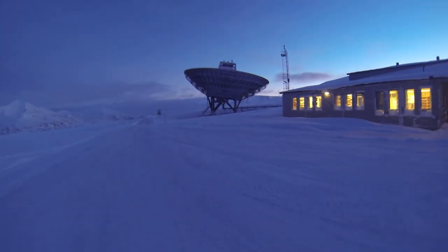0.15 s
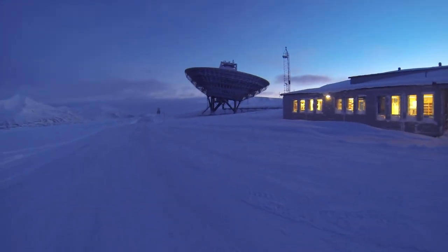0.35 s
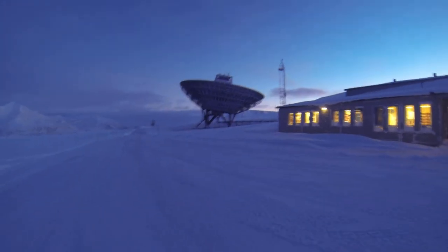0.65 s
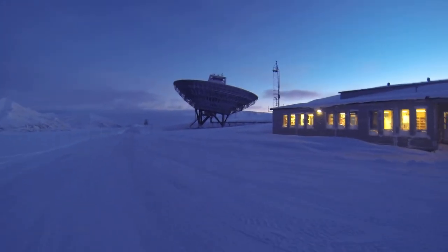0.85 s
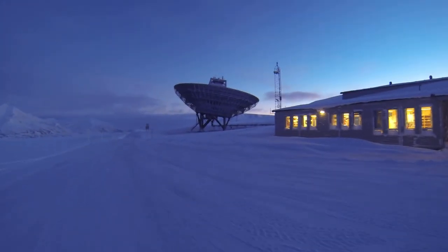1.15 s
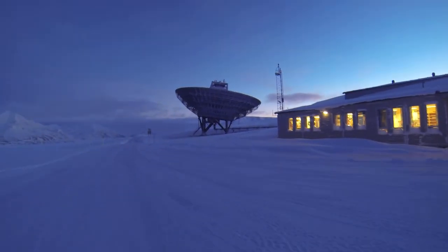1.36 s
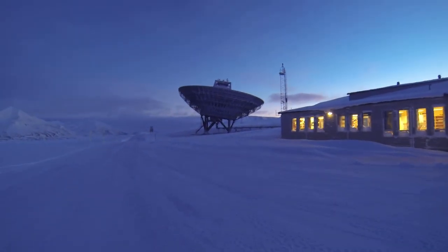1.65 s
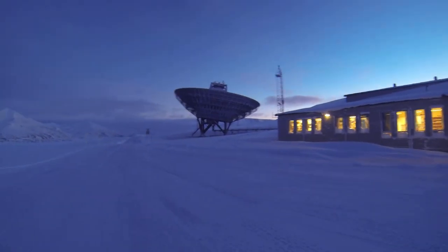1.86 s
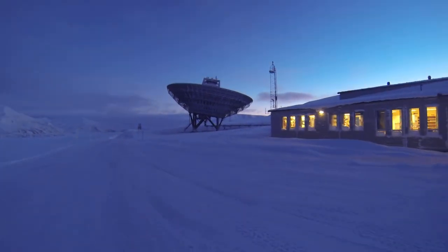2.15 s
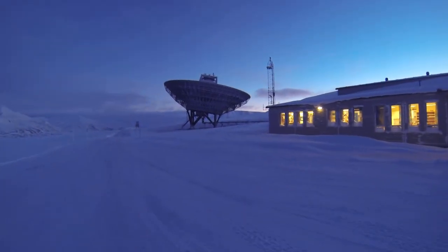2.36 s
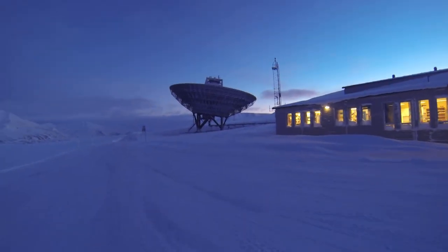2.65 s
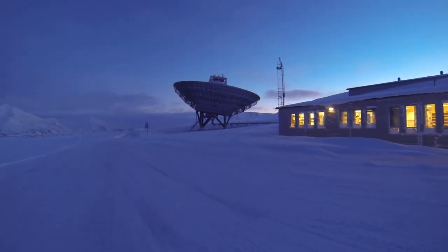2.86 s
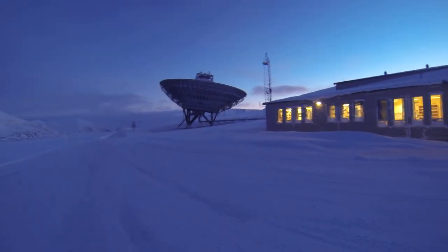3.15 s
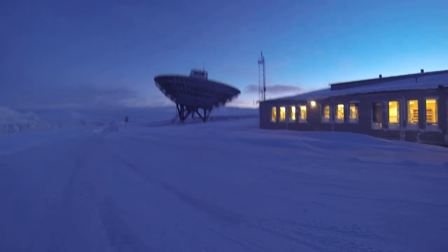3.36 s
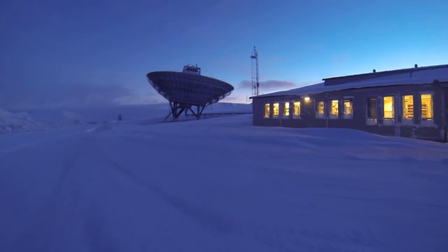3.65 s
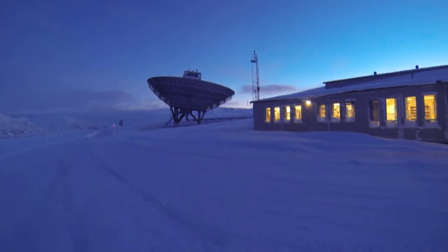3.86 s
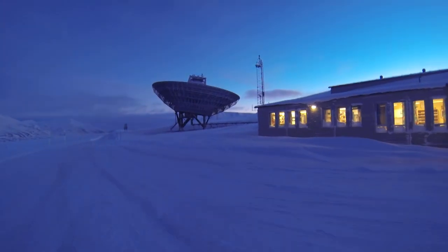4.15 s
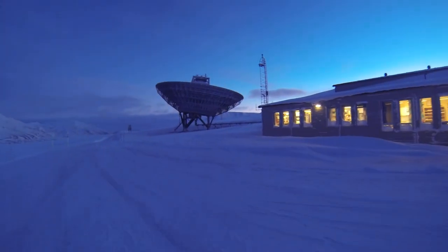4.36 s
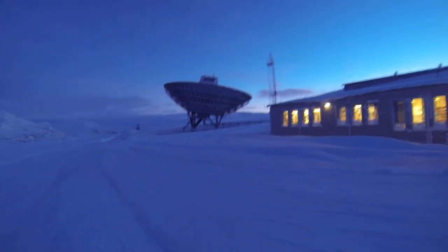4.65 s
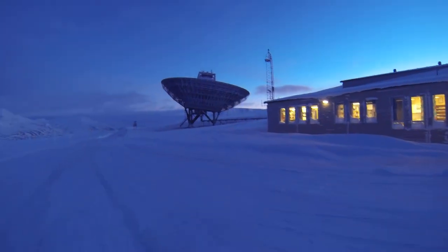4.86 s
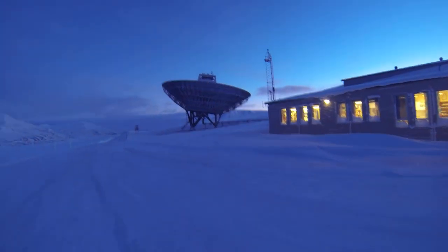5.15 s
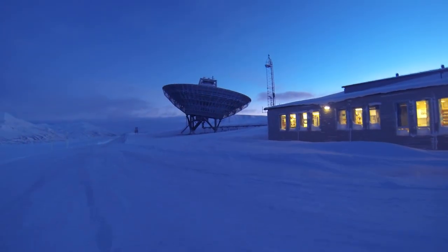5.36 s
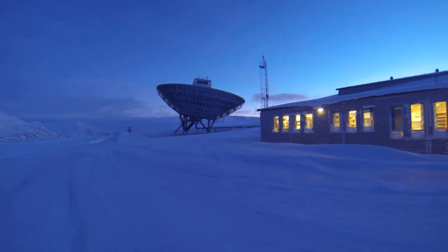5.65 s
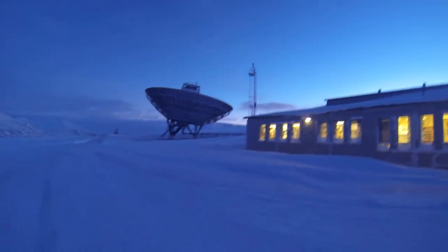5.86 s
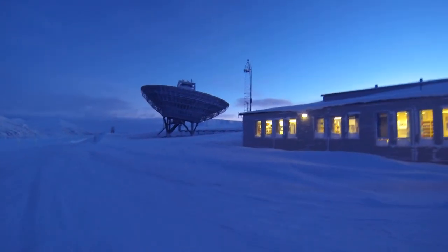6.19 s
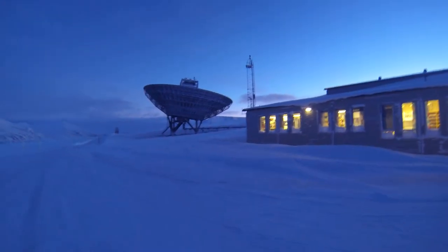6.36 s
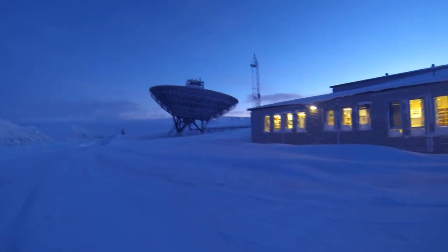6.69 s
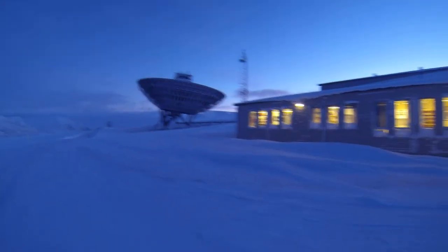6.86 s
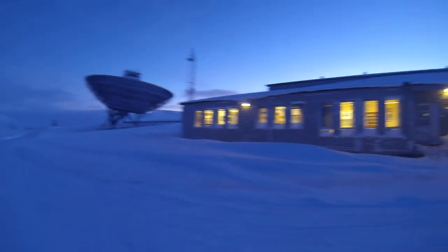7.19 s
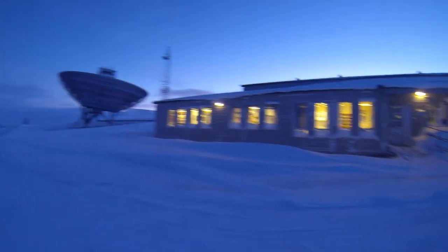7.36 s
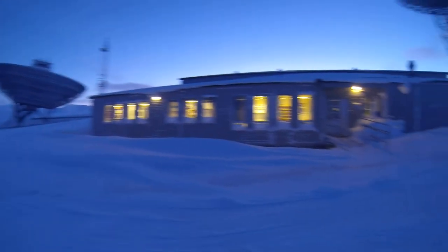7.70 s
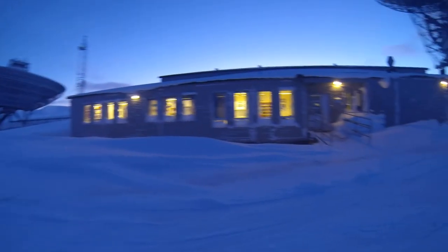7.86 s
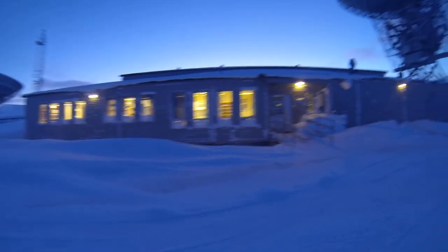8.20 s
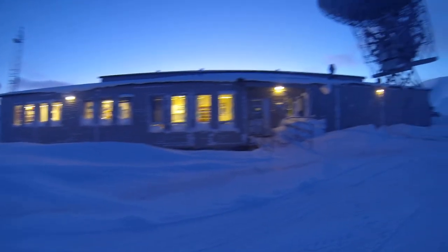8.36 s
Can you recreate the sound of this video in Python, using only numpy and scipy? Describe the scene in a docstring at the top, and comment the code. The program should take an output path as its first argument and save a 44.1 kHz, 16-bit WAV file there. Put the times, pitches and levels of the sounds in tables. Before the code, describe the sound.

Close, dry outdoor sound from a camera held by the walker: about a dozen slow footsteps on packed snow, each made of many tiny squeaks fused into a creak over crunching, rasping crystals. Wind rumbles deep and unevenly, swelling early, near the middle and again later. Occasional dull knocks and clothing ticks fall between steps; steady faint hiss lies beneath.

```python
"""Someone walks over cold, packed snow, camera in hand, in open ground without echo, amid gusty wind and hiss.
At first a boot pushes off; from 0.25 s boot follows boot, each creaking by stick-slip: many brief squeaks that
run together as the weight comes on, over a crunch and rasp of breaking crystals. Thin chirps recur from 0.3 s,
cloth ticks from 1.1 s and gear knocks on the camera from 1.7 s. The wind, shaped noise, swells most near 0.7,
3 and 6 s; a last, lighter step lands at 8.3 s."""
import sys
import numpy as np
from scipy import signal
from scipy.fft import rfft, irfft, next_fast_len
from scipy.io import wavfile
from scipy.ndimage import uniform_filter1d

SR = 44100
rng = np.random.default_rng(int(sys.argv[2]) if len(sys.argv) > 2 else 0)


def master(y):
    """Save y as 16-bit WAV."""
    cut = np.clip(np.atleast_2d(y).T, -1, 1)
    pcm = np.round(cut * 32767)  # scale
    wavfile.write(sys.argv[1], SR, pcm.astype(np.int16))


N = 376305
TIME = np.arange(N) / SR  # [s]


def undb(db):
    """Logarithmic level: decibels become an amplitude gain."""
    return 10 ** (np.asarray(db) / 20)


def unit(x):
    """Normalisation: scale to an rms of 1."""
    return x / np.sqrt(np.mean(x ** 2))


def curve(rows):
    """Linear interpolation: join (time [s], value) rows by straight lines."""
    return np.interp(TIME, *np.transpose(rows))


def gains(points, hz):
    """Spectral envelope: gain of (frequency [Hz], level [dB]) rows, interpolated over log frequency."""
    f, db = np.transpose(points)
    return undb(np.interp(np.log(np.maximum(hz, 1)), np.log(f), db))


def noise(points):
    """Spectral shaping: white noise is weighted in frequency and scaled to an rms of 1."""
    size = next_fast_len(N)
    white = rfft(rng.standard_normal(size))
    shaped = white * gains(points, np.fft.rfftfreq(size, 1 / SR))
    return unit(irfft(shaped, size)[:N])


def ring(points, size=1024):
    """Minimum phase: the causal impulse response of a body with this spectrum, peak 1."""
    cepstrum = irfft(np.log(gains(points, np.fft.rfftfreq(size, 1 / SR))))
    # fold the cepstrum onto positive time
    cepstrum[1:size // 2] *= 2
    cepstrum[size // 2 + 1:] = 0
    response = irfft(np.exp(rfft(cepstrum)))
    return response / np.abs(response).max()


def steady(x, span_s):
    """Envelope flattening: even out swells slower than span_s, keep the fine grain, bring rms near 1."""
    width = int(span_s * SR) + 1
    power = uniform_filter1d(uniform_filter1d(x ** 2, width), width)
    return x / np.sqrt(power + 1e-12)


def add(track, s, sound):
    """Superposition: mix a sound into the track at time s."""
    start = max(int(s * SR), 0)
    track[start:start + len(sound)] += sound[:max(N - start, 0)]


def stick_slip(rate, jitter, scatter_db):
    """Stick-slip: stress builds at the given rate and lets go at uneven thresholds, in uneven pulses."""
    chance = rng.standard_normal((N // 10, 2))
    stress_built = np.cumsum(rate) / SR
    thresholds = np.cumsum(np.exp(jitter * chance[:, 0]))
    at = np.searchsorted(stress_built, thresholds)
    sizes = undb(scatter_db * np.clip(chance[:, 1], -2, 2))
    return np.bincount(at, sizes, N + 1)[:N]


LAND_DB_PER_S, ROLL_S = 200, .12  # the heel sinks in, the weight rolls on
REST_DB, CRUNCH_REST_DB, RASP_REST_DB = -65.5, -75, -85.5  # under the standing foot
RASP_SLOPE = 1.4  # the rasp needs the full weight: dB per dB of weight level

# footsteps: (heel lands [s], full weight [s], toe pushes off [s], lifting rate [dB/s],
# creak under heel [dB], creak at full weight [dB], creak at push [dB], easing between the two [dB],
# crunch [dB], rasp [dB])
FOOTSTEPS = [(-0.35, -0.15, 0.02, 130, -58, -54, -55.5, 0.5, -65, -86),
             (0.248, 0.361, 0.55, 70, -56, -49.5, -49.5, 5, -66.5, -65),
             (0.86, 1.159, 1.28, 130, -61, -53, -52, 4, -69, -70),
             (1.519, 1.73, 1.89, 150, -58, -53, -49.5, 3, -66, -67),
             (2.0, 2.41, 2.53, 160, -56.5, -47, -48, 1.5, -62, -67),
             (2.869, 3.011, 3.24, 100, -57, -49, -50, 4.5, -64, -67),
             (3.551, 3.72, 3.86, 95, -59, -48, -49, 0.5, -63.5, -64.5),
             (4.27, 4.36, 4.52, 170, -56, -53, -47.5, 1.5, -65, -75),
             (4.709, 4.989, 5.1, 85, -57.5, -50, -48, 1, -64.5, -67),
             (5.35, 5.775, 5.885, 140.5, -57.5, -46, -46.5, 1.5, -63, -69),
             (6.139, 6.391, 6.625, 380, -57, -47, -51, 0.5, -65.5, -64),
             (7.019, 7.17, 7.29, 150, -55, -47.5, -50, 1, -65.5, -74),
             (7.5, 7.84, 7.98, 260.5, -58, -51, -47.5, 2.5, -64.5, -74),
             (8.29, 8.377, 9.3, 110, -62, -63, -59, 2, -75, -86)]


def tread():
    """Load transfer: each boot lands on its heel, takes the weight, eases, pushes off and lifts (levels in dB)."""
    creak_db, crunch_db, rasp_db = (np.full(N, 1. * db) for db in (REST_DB, CRUNCH_REST_DB, RASP_REST_DB))
    for (lands, full, pushes, lift_db_per_s,
         heel_db, full_db, push_db, ease_db, crystals_db, grind_db) in FOOTSTEPS:
        rolling_db = np.clip((full - TIME) / ROLL_S, 0, 1) * (heel_db - full_db)
        landing_db = -LAND_DB_PER_S * np.maximum(lands - TIME, 0)
        lifting_db = -lift_db_per_s * np.maximum(TIME - pushes, 0)
        weight_db = rolling_db + landing_db + lifting_db
        stance = np.clip((TIME - full) / (pushes - full), 0, 1)
        press_db = full_db + stance * (push_db - full_db) - ease_db * np.sin(np.pi * stance) ** 2
        # the louder boot prevails
        creak_db = np.maximum(creak_db, press_db + weight_db)
        crunch_db = np.maximum(crunch_db, crystals_db + weight_db)
        rasp_db = np.maximum(rasp_db, grind_db + RASP_SLOPE * weight_db)
    return creak_db, crunch_db, rasp_db


# typical pitch of a slip [Hz], its scatter [share], typical length of a single slip [s]
SQUEAK_HZ, SQUEAK_SPREAD, SLIP_S = 1446, 0.032, 0.0051

# partials of a juddering sole: (multiple of the pitch, level [dB])
JUDDER_PARTIALS = [(1, 0), (.58, -22), (1.6, -25)]


def squeak(hz, length_s, edge):
    """Frictional vibration: in one slip the sole judders for a few cycles, swelling and dying away."""
    t = TIME[:int(length_s * SR)]
    multiple, db = np.transpose(JUDDER_PARTIALS)
    judder = undb(db) @ np.sin(2 * np.pi * hz * np.outer(multiple, t))
    swell = np.sin(np.pi * t / length_s) ** edge
    return swell * judder


REFERENCE_SLIP_DB = -34  # level of a slip that lasts SLIP_S
SNAP_SHORTENS = 0.024  # a louder slip is over sooner: log length per dB

# single distinct slips of the snow under the sole, faint to loud: (time [s], level [dB], pitch [Hz])
DISTINCT_SLIPS = [(0.211, -49, 1500), (0.234, -45, 1450), (0.2882, -35.5, 1510), (0.387, -41, 1530),
                  (1.0, -49, 1460), (1.156, -43, 1408), (1.262, -42.5, 1470), (1.507, -42, 1510),
                  (1.561, -37.5, 1445), (1.615, -42, 1420), (1.888, -45, 1450), (1.928, -42.5, 1470),
                  (1.985, -43, 1450), (2.0535, -31, 1440), (2.1137, -39, 1480), (2.23, -38.5, 1400),
                  (2.267, -43, 1360), (2.3097, -27.5, 1415), (2.3374, -40.5, 1300), (2.353, -41, 1340),
                  (2.588, -42.5, 1535), (2.6226, -42, 1474), (2.6626, -41, 1478), (2.7763, -33.5, 1485),
                  (2.8919, -34, 1540), (2.918, -45, 1530), (2.941, -42, 1414), (2.994, -39.5, 1515),
                  (3.206, -36.5, 1460), (3.297, -55, 1446), (3.327, -60.5, 1470), (3.376, -42.5, 1450),
                  (3.423, -44, 1470), (3.448, -42.5, 1373), (3.5052, -40, 1510), (3.5442, -39.5, 1549),
                  (3.5738, -35.5, 1430), (3.6259, -35, 1364), (3.649, -36, 1430), (3.665, -36.5, 1400),
                  (3.686, -38, 1540), (3.719, -43, 1507), (4.142, -40, 1365), (4.2874, -37, 1380),
                  (4.3874, -37, 1456), (4.4145, -36.5, 1370), (4.4924, -31.5, 1502), (4.579, -41, 1470),
                  (4.697, -41, 1467), (4.757, -39, 1424), (4.828, -39.5, 1520), (4.934, -36.5, 1432),
                  (4.9682, -39, 1429), (4.984, -34, 1530), (4.997, -33, 1370), (5.0402, -33, 1400),
                  (5.069, -33, 1478), (5.095, -33.5, 1403), (5.619, -40, 1467), (5.713, -38.5, 1475),
                  (5.7495, -35.5, 1427), (5.848, -36, 1466), (6.1657, -35.5, 1383), (6.209, -42, 1524),
                  (6.2884, -36.5, 1466), (6.3139, -36.5, 1337), (6.345, -35, 1370), (6.359, -38, 1450),
                  (6.39, -31.5, 1360), (6.418, -27.5, 1457), (6.4311, -35, 1570), (6.452, -36, 1525),
                  (6.4752, -35.5, 1544), (6.4904, -31, 1460), (6.543, -38.5, 1478), (6.584, -39.5, 1500),
                  (6.6363, -35.5, 1507), (6.854, -44, 1474), (6.899, -47.5, 1462), (6.948, -48, 1489),
                  (6.994, -48, 1518), (7.035, -43, 1523), (7.072, -42.5, 1490), (7.097, -42, 1471),
                  (7.155, -40, 1475), (7.1783, -37, 1470), (7.3027, -37, 1430), (7.3408, -37.5, 1521),
                  (7.347, -37, 1472), (7.398, -43.5, 1493), (7.448, -45.5, 1440), (7.5236, -37.5, 1394),
                  (7.6244, -40, 1372), (7.694, -42, 1455), (7.78, -45, 1409), (7.841, -37.5, 1440),
                  (7.914, -40, 1452), (7.9673, -37.5, 1400), (7.9895, -34, 1434), (8.044, -46.5, 1534),
                  (8.297, -48, 1503), (8.3435, -36, 1460), (8.387, -50, 1480), (8.463, -43, 1433)]


def distinct_slips():
    """Sudden stress release: each distinct slip is a short squeak, and the loudest are the briefest."""
    out = np.zeros(N)
    for s, db, hz in DISTINCT_SLIPS:
        length_s = SLIP_S * np.exp(-SNAP_SHORTENS * (db - REFERENCE_SLIP_DB))
        add(out, s - .0015, undb(db) * squeak(hz, length_s, edge=0.94))
    return out


RELIEF_S, RELIEF = 0.015, .62  # a distinct slip takes up the stress: span [s], share taken


def stress():
    """Stress relief: the share left for the other slips dips round each distinct one."""
    relief = np.zeros(N)
    for s, _, _ in DISTINCT_SLIPS:
        add(relief, s + SLIP_S / 2 - RELIEF_S / 2, np.hanning(int(RELIEF_S * SR)))
    return np.clip(1 - RELIEF * relief, 0, 1)


# stress build-up while a boot presses and under the standing foot [typical slips per s]
LOOSE_PER_S, LOOSE_REST_PER_S = 34, 5
# heel load as creak level [dB], typical slip level there [dB], dB per dB of lighter load
HEEL_DB, LOOSE_DB, LOOSE_SLOPE = -56, -43, 0.63


def loose_slips(tread_db):
    """Isolated stick-slip: slips break loose one by one at random, mostly while a boot is pressing."""
    out = np.zeros(N)
    light_db = np.minimum(tread_db - HEEL_DB, 0)
    rate = np.where(tread_db > REST_DB, LOOSE_PER_S, LOOSE_REST_PER_S)
    pulses = stick_slip(rate, jitter=.6, scatter_db=2.5)
    at = np.flatnonzero(pulses)
    for i, (detune, stretch) in zip(at, rng.standard_normal((len(at), 2))):
        size = pulses[i] * undb(LOOSE_DB + LOOSE_SLOPE * light_db[i])
        hz = SQUEAK_HZ * (1 + SQUEAK_SPREAD * detune)
        length_s = SLIP_S * np.exp(0.26 * stretch)
        add(out, i / SR, size * squeak(hz, length_s, edge=6.6))
    return out


# stress build-up under a light foot, and added at full weight [typical slips per s]
CREAK_PER_S, CREAK_GAIN_PER_S = 165, 170
CREAK_SLIP_S, CREAK_SHORTENS = .006, .2  # typical slip under a light foot [s], share lost at full weight
SQUEAK_RISE, SQUEAK_WANDER = 0.02, 0.013  # pitch rise at full weight, wander with the snow [shares]
GRIP_DB = 1.0  # rms change of level with the snow's hold


def creak(tread_db):
    """Dense stick-slip: under more weight slips come faster, higher, shorter and more evenly."""
    load = undb(tread_db - tread_db.max())
    # the snow's hold and firmness vary along the sole
    grip = noise([(1, 0), (15, 0), (60, -48), (300, -140)])
    firmness = noise([(1, 0), (12, 0), (50, -48), (300, -140)])
    rate = (CREAK_PER_S + CREAK_GAIN_PER_S * load ** 2) * np.exp(.2 * grip)
    pulses = stick_slip(rate, jitter=.28, scatter_db=4.5)
    at = np.flatnonzero(pulses)
    out = np.zeros(N)
    for i, (detune, stretch, late) in zip(at, rng.standard_normal((len(at), 3))):
        s = i / SR + 0.003146 * (1 - load[i]) ** 2 * late  # uneven timing under a light foot
        pitch_shift = SQUEAK_RISE * load[i] + SQUEAK_WANDER * firmness[i] + SQUEAK_SPREAD * detune
        hz = SQUEAK_HZ * (1 + pitch_shift)
        length_s = CREAK_SLIP_S * (1 - CREAK_SHORTENS * load[i]) * np.exp(.2 * stretch)
        add(out, s - length_s / 2, pulses[i] * squeak(hz, length_s, edge=1.0))
    return steady(out, .035) * undb(tread_db + GRIP_DB * grip)


def fracture(colour, level_db):
    """Brittle fracture: countless crystals snap, each an impulse of random sign and size that rings."""
    pulses = stick_slip(np.full(N, 1200.), jitter=.9, scatter_db=9.5) * rng.choice([-1, 1], N)
    snaps = steady(signal.fftconvolve(pulses, ring(colour))[:N], .06)
    return snaps * undb(level_db)


# crystals breaking under the boot: (frequency [Hz], relative level [dB])
CRUNCH_SPECTRUM = [(150, -11.5), (330, 1.5), (700, 4.5), (1100, -3), (1600, -4), (2000, -4.5), (2600, -3.5),
                   (2900, -7.5), (3400, -7.5), (3900, -17), (5000, -15.5), (12000, -28)]


def crunch(level_db):
    """Compaction: crystals snap while the snow is pressed."""
    return fracture(CRUNCH_SPECTRUM, level_db)


RASP_WITH_SLIPS = 0.63  # share of the rasp's power that comes in spurts

# the sole grinding under full weight: (frequency [Hz], relative level [dB])
RASP_SPECTRUM = [(800, -29), (1500, -19), (1850, -2), (2050, -15), (2200, 0), (2350, -1), (2450, -10),
                 (2600, -5.5), (2780, -12.5), (4000, -28), (12000, -54)]


def rasp(squeaks, level_db):
    """Abrasion: the sole grinds crystals, most while it slips."""
    slip_level = np.sqrt(np.abs(uniform_filter1d(squeaks ** 2, int(.002 * SR))))
    slipping = steady(slip_level, .06)
    spurts = np.sqrt(1 - RASP_WITH_SLIPS + RASP_WITH_SLIPS * slipping ** 2)
    return spurts * fracture(RASP_SPECTRUM, level_db)


# knocks of carried gear on the camera: (time [s], thud level [dB], clack level [dB],
# hardness as a low-pass corner [Hz]), levels before the low-pass
GEAR_KNOCKS = [(1.7254, -37.5, -41, 2984), (1.891, -70, -27.5, 1202), (2.788, -47, -52, 499.6),
               (3.148, -40, -22.5, 566), (3.158, -68, -60, 259.8), (3.339, -40, -60, 239.5),
               (3.4003, -46, -28.5, 950), (4.255, -51, -51, 500), (4.536, -38, -22, 3807),
               (4.934, -38.5, -35, 799.8), (6.568, -40, -56.5, 298), (6.977, -46.5, -62, 330.6),
               (7.130, -40.5, -32, 1001), (7.881, -39, -59, 279.8), (8.236, -54, -57, 399.6),
               (8.330, -35.5, -26.5, 402), (8.402, -43.5, -60, 301)]
# the camera body's low ring: (frequency [Hz], relative level [dB], 60 dB decay time [s])
BODY_MODES = [(161.3, 3.5, 0.072), (107, 13, 0.015), (330, 0, 0.0093)]
# the hard contact of a knock: (frequency [Hz], relative level [dB])
CLACK_SPECTRUM = [(100, 3.5), (330, 6.5), (560, -0.5), (850, 5.5), (1150, -1.5), (1550, 10), (1900, 7),
                  (2250, -20), (2700, -15), (3160, -24), (4000, -35), (12000, -41)]


def knocks():
    """Impact and modal decay: a contact with the low ring of the body; a soft contact dulls both."""
    out, t = np.zeros(N), TIME[:SR // 8]
    thud = np.zeros(len(t))
    for hz, db, t60 in BODY_MODES:
        thud += undb(db) * np.sin(2 * np.pi * hz * t) * np.exp(-np.log(1000) * t / t60)
    clack = ring(CLACK_SPECTRUM, size=2 * len(t))[:len(t)]
    for s, thud_db, clack_db, corner_hz in GEAR_KNOCKS:
        blow = undb(thud_db) * thud + undb(clack_db) * clack
        add(out, s, signal.lfilter(*signal.butter(3, corner_hz, fs=SR), blow))
    return out


TICK_RISE_S = 0.00022  # time constant: cloth catches softly

# small ticks and scuffs of stiff clothing: (time [s], level before the rise and the split [dB],
# decay time constant [s], share of bright snap [0-1])
CLOTH_TICKS = [(1.128, -67, .015, 0.05), (1.328, -57, 0.0015, .9), (1.724, -51, 0.006, 0),
               (2.535, -61, 0.022, 0.1), (2.985, -65, 0.04, 0.05), (3.004, -52, 0.0066, 0.1),
               (3.025, -61, 0.015, .04), (3.151, -63, 0.03, 0.03), (3.383, -59.5, 0.027, 0.05),
               (3.42, -63, 0.022, 0), (3.7778, -46.5, .002, 0.2), (4.932, -59, 0.0049, 0),
               (5.155, -59.5, 0.0018, 0.9), (5.243, -52.5, 0.0029, 0.01), (5.3741, -55, 0.0014, 0.83),
               (5.541, -55, 0.006, 0.19), (5.664, -51, 0.0031, 0.07), (5.875, -54.5, 0.0048, 0.05),
               (5.923, -57, 0.0027, 0.02), (6.164, -60.5, .004, 0), (7.652, -55, 0.0097, 0.04),
               (7.8, -66, 0.049, 0.01), (8.328, -64, .006, 0.02)]
# what the stiff cloth rings with: (frequency [Hz], relative level [dB])
CLOTH_SPECTRUM = [(800, -12), (2000, -4), (2500, -3), (2850, 2), (3350, 4), (3650, -4), (4150, -15),
                  (4950, -5), (5600, -17), (14000, -28)]
# the bright snap: (frequency [Hz], relative level [dB])
SNAP_SPECTRUM = [(3000, -23), (7500, 8), (11000, 6), (15000, -5)]


def ticks():
    """Dry friction: stiff clothing ticks and scuffs in short bursts of dull and bright noise."""
    dull, bright, t = np.zeros(N), np.zeros(N), TIME[:SR // 8]
    for s, db, decay_s, share in CLOTH_TICKS:
        burst = undb(db) * (1 - np.exp(-t / TICK_RISE_S)) * np.exp(-t / decay_s)  # a catch, then a short rub
        add(dull, s, (1 - share) * burst)
        add(bright, s, share * burst)
    return dull * noise(CLOTH_SPECTRUM) + bright * noise(SNAP_SPECTRUM)


# faint chirps of swinging gear: (time [s])
CHIRP_TIMES = [0.305, 1.305, 2.41, 3.425, 4.558, 5.75, 6.731, 7.824]


def chirps(pitch_hz, level_db, glide):
    """Frequency glide: swinging gear gives thin tones that fall through pitch_hz by at most +-glide."""
    out, swell = np.zeros(N), np.hanning(int(0.047 * SR))
    fall = np.linspace(1, -1, len(swell))
    for s in CHIRP_TIMES:
        hz = pitch_hz * (1 + glide * fall * rng.uniform(0.024, 1))
        phase = 2 * np.pi * np.cumsum(hz) / SR
        add(out, s, undb(level_db) * swell * np.sin(phase))
    return out


FLUTTER_DB, EDDY_FLUTTER_DB = 2.2, 2.54  # rms swing of level within a gust

# wind on the microphone: (time [s], gust level before offset and flutter [dB])
GUST_LEVELS = [(0.1, -44), (.38, -43), (.66, -34.5), (.88, -43), (1.2, -39.5), (1.42, -43), (1.8, -38.5),
               (2.6, -43), (2.95, -35.5), (3.55, -46.5), (3.85, -41), (4.08, -45), (4.5, -39.5),
               (5.35, -40), (5.95, -33), (6.25, -38.5), (6.75, -38), (7.08, -43.5), (7.8, -39), (8.53, -44)]
# finer eddies round the housing: (time [s], level before flutter [dB])
EDDY_LEVELS = [(0.03, -49.5), (.27, -63), (.44, -58.5), (.54, -44), (.74, -48), (.92, -53), (1.05, -48),
               (1.3, -52.5), (1.6, -50), (1.85, -54), (2.14, -45), (2.28, -60), (2.6, -52), (2.87, -49.5),
               (3.3, -53), (3.68, -59.5), (3.88, -53.5), (4.0, -57), (4.2, -51), (4.6, -52.5), (4.82, -46),
               (5.2, -49), (5.52, -44), (5.68, -47), (5.92, -44), (6.22, -44.5), (6.37, -49), (6.58, -44),
               (6.92, -52.5), (7.27, -48), (7.4, -50.5), (7.6, -46.5), (7.8, -54.5), (7.95, -48),
               (8.18, -62), (8.53, -57)]
# spectra of the slowest pressure swings, the buffeting and the finer eddies:
# (frequency [Hz], relative level [dB])
SWAY_SPECTRUM = [(2, 0), (6, -5), (10, 3), (15, -8), (20, -20), (30, -6), (60, -99)]
BUFFET_SPECTRUM = [(8, -53.5), (15, -6), (22, -6), (32, -12.5), (45, -13), (65, -19), (100, -38),
                   (200, -45.5), (500, -108), (2000, -160)]
EDDY_SPECTRUM = [(30, -24), (70, 3), (110, 2.5), (130, 1), (165, 2), (205, -10.5), (300, -15), (420, -18.5),
                 (600, -26.5), (1000, -23), (2000, -30), (6000, -85), (15000, -100)]
# quick swells within a gust: (modulation frequency [Hz], relative level [dB])
FLUTTER_SPECTRUM = [(1, -10), (4, -3.5), (8, -2.5), (30, -32), (200, -140)]


def wind():
    """Turbulence: large eddies sway and shake the diaphragm, small ones rumble round the housing."""
    gust_db = curve(GUST_LEVELS)
    sway_db = .5 * gust_db - 13.0
    buffet_db = gust_db + 1.0 + FLUTTER_DB * noise(FLUTTER_SPECTRUM)
    eddy_db = curve(EDDY_LEVELS) + EDDY_FLUTTER_DB * noise(FLUTTER_SPECTRUM)
    sway = steady(noise(SWAY_SPECTRUM), 0.18) * undb(sway_db)
    buffet = steady(noise(BUFFET_SPECTRUM), 0.12) * undb(buffet_db)
    eddies = steady(noise(EDDY_SPECTRUM), 0.084) * undb(eddy_db)
    return sway + buffet + eddies


# steady hiss of air and microphone: (frequency [Hz], relative level [dB])
HISS_SPECTRUM = [(100, 18.5), (500, 11.5), (900, 5.5), (1800, 5.5), (2500, 1), (3300, 2.5), (3900, -0.5),
                 (5000, -2.5), (7000, -5.5), (9300, -9.5), (10100, -7.5), (11300, -11.5), (12500, -9),
                 (15000, -13)]


def hiss(level_db):
    """Stationary noise: air and microphone hiss steadily."""
    return undb(level_db) * noise(HISS_SPECTRUM)


def scene():
    """Superposition of sources: boots, gear and wind over a quiet hiss."""
    tread_db, crunch_db, rasp_db = tread()
    other_slips = loose_slips(tread_db) + creak(tread_db)
    squeaks = distinct_slips() + stress() * other_slips
    boots = squeaks + crunch(crunch_db) + rasp(squeaks, rasp_db)
    gear = knocks() + ticks() + chirps(pitch_hz=6700, level_db=-72.5, glide=0.019)
    return (boots + gear + wind() + hiss(level_db=-62.0))[None]


TOP_HZ = 15300  # upper band edge


def record(dry):
    """Band limiting: the camera cuts the top with a steep elliptic low-pass."""
    low_pass = signal.ellip(10, .2, 80, TOP_HZ, fs=SR, output="sos")
    return signal.sosfilt(low_pass, dry)


dry = scene()
out = record(dry)
master(out)
```